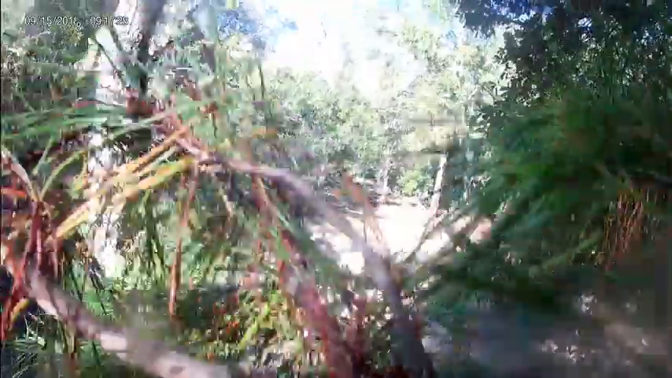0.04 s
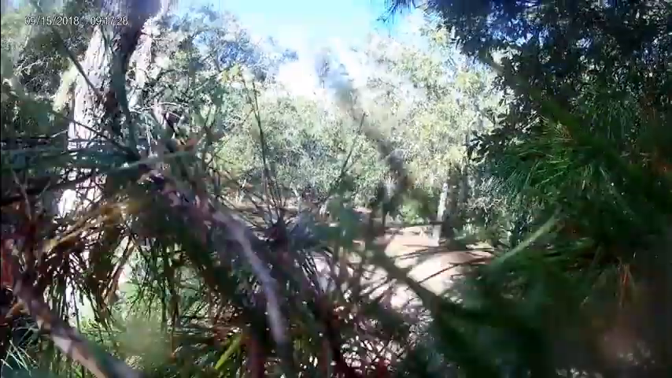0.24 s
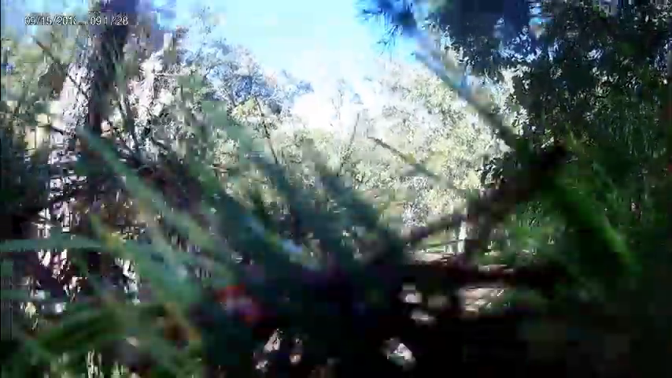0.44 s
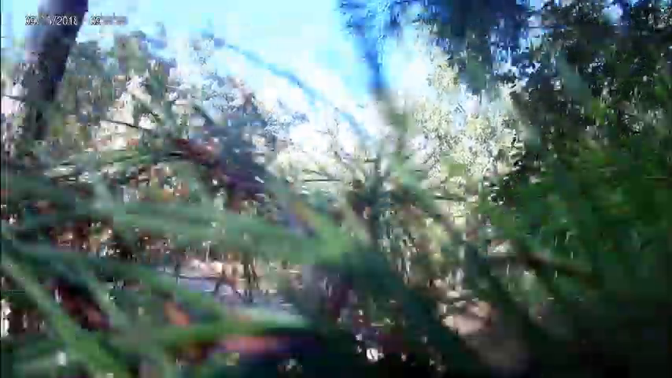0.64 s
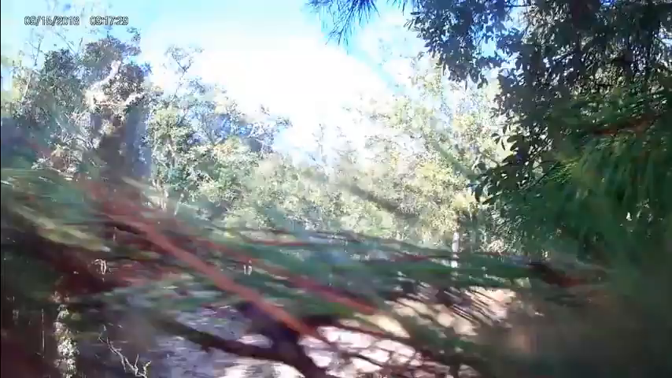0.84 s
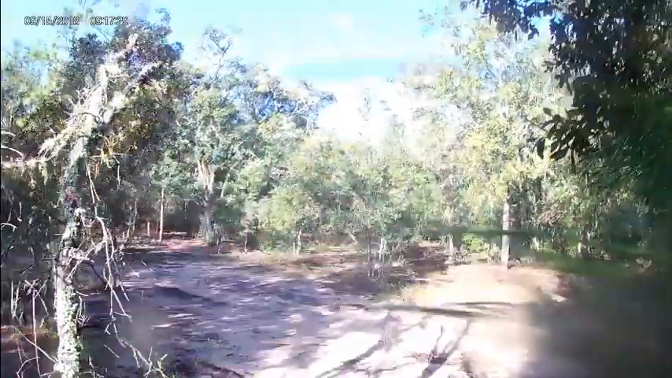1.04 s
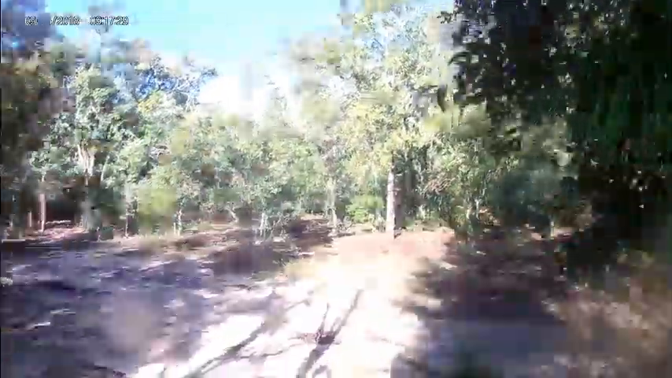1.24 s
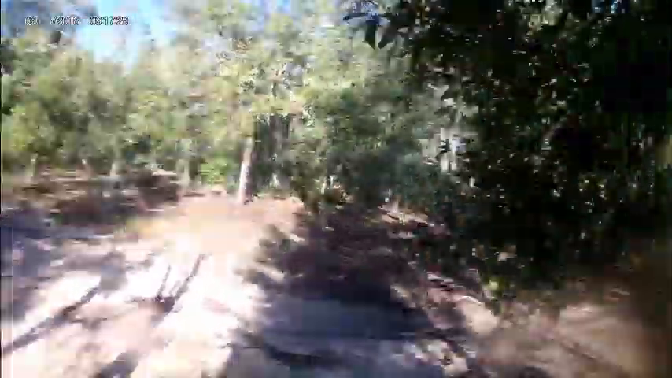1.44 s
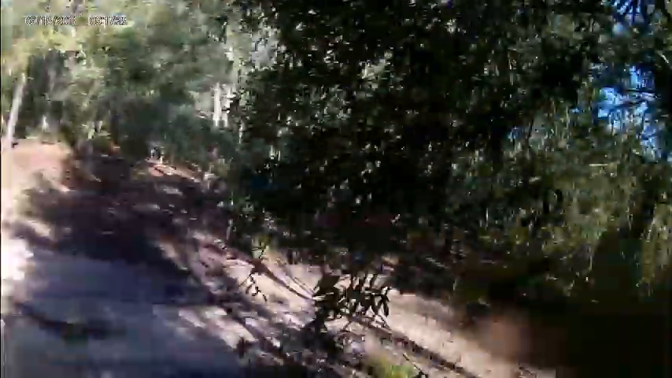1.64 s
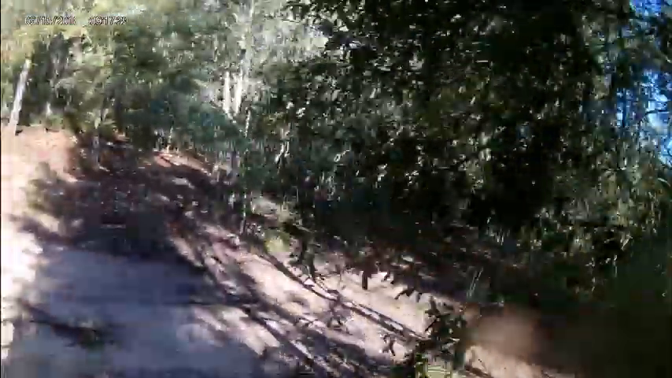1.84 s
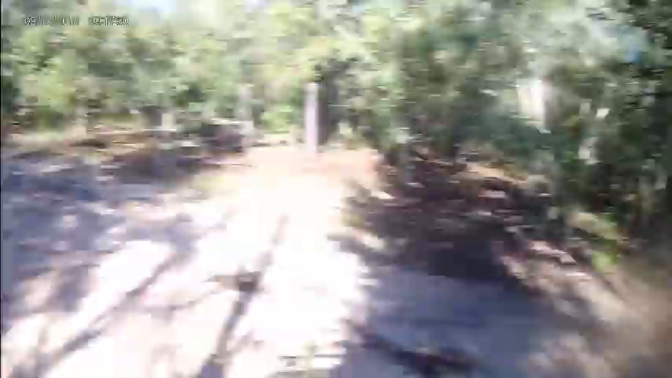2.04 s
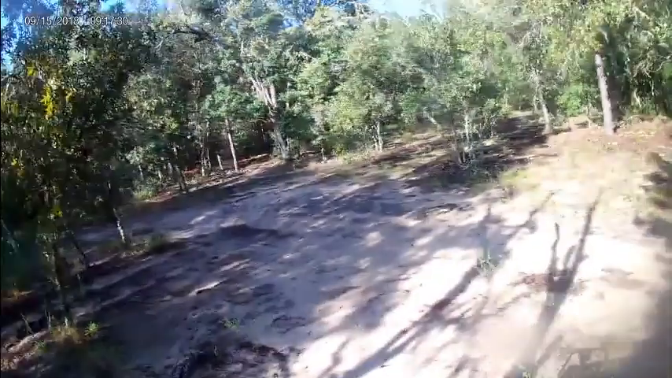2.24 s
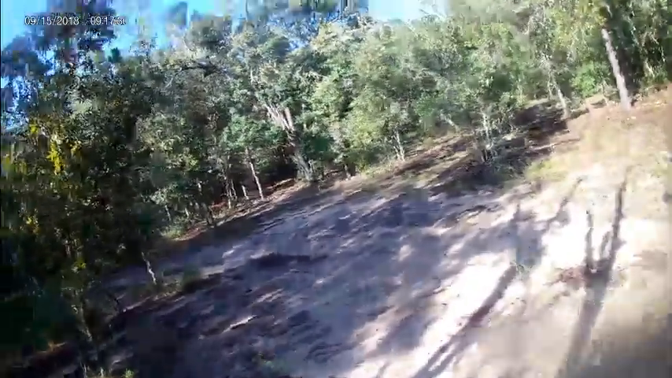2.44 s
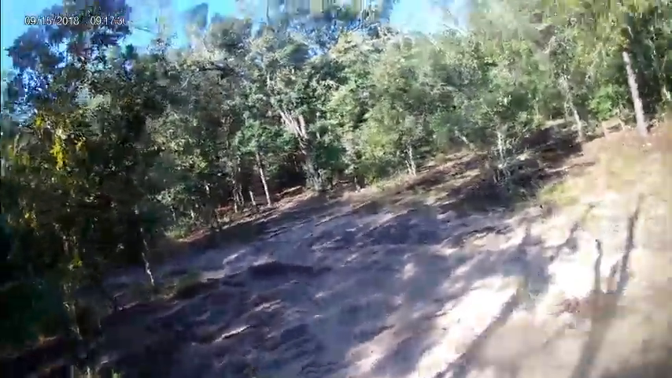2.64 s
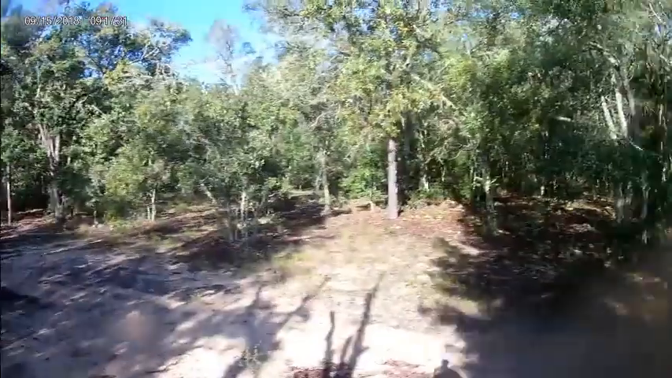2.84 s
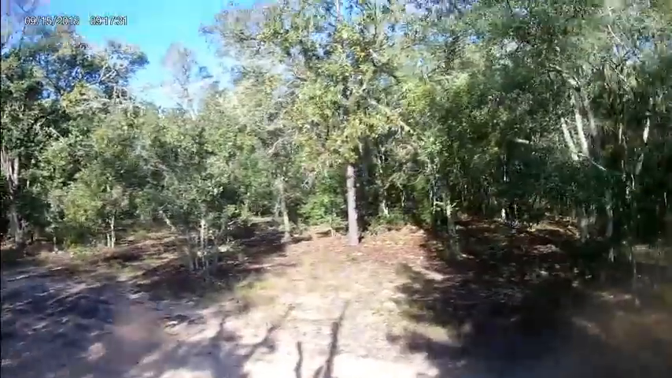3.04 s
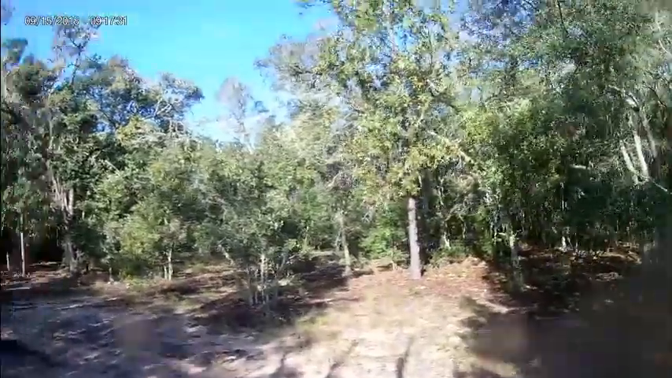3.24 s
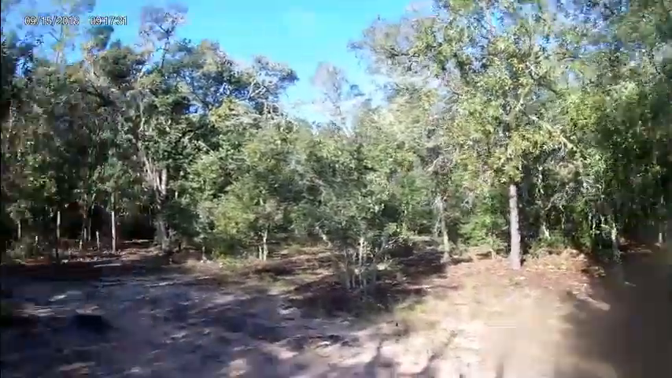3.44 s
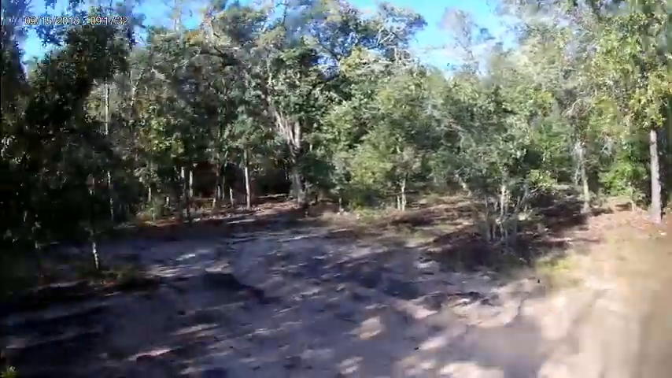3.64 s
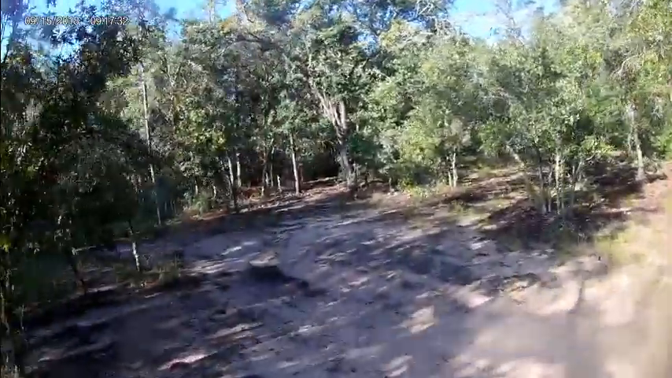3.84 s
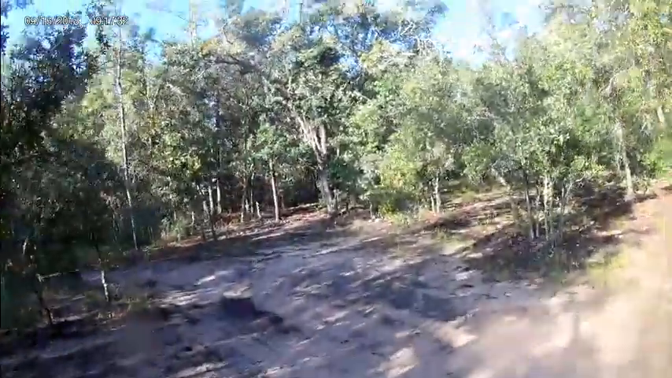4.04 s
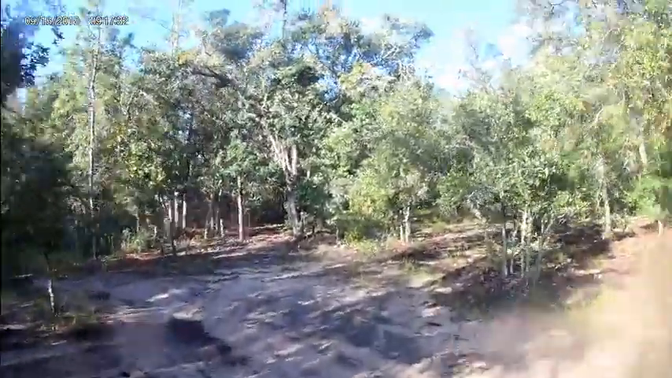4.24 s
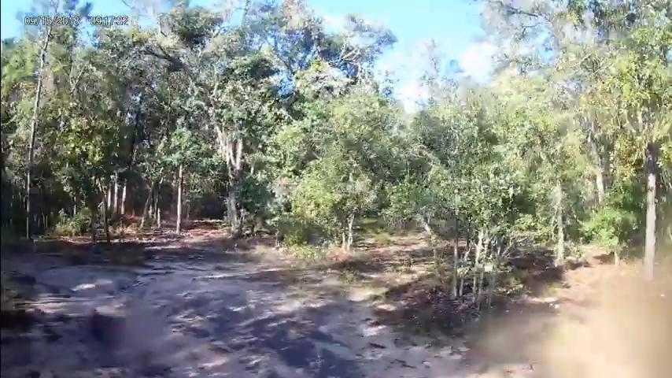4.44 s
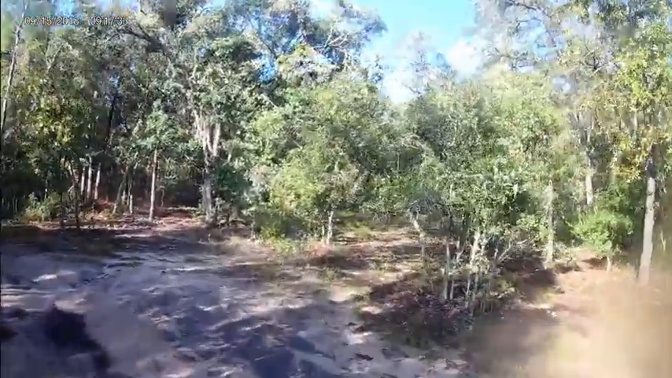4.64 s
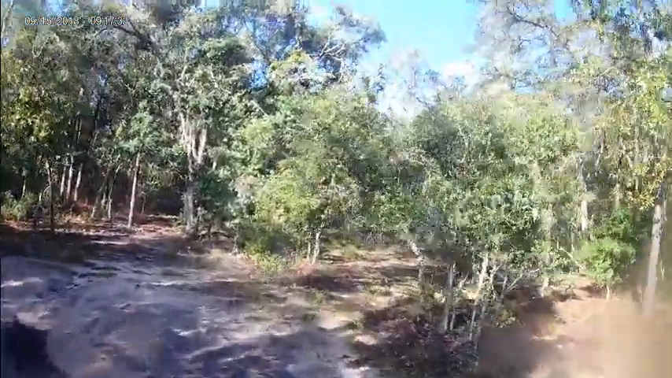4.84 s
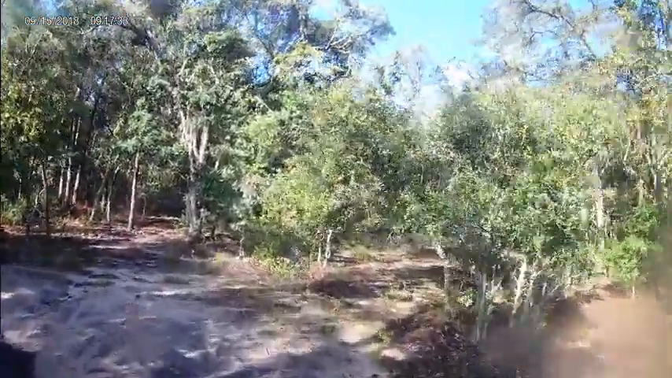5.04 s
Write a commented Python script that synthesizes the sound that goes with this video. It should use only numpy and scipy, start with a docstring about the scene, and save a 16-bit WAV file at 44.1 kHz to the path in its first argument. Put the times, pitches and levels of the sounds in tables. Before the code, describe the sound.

From the start, pine branches drag right across a microphone riding on a slow quad bike, in a quick run of rasping, scratchy strokes. They are loudest from about 0.6 to 1.1 seconds, where boughs thump dully, needles squeak, twigs flick with sharp clicks and the scrape brightens to a hiss. A last, softer brush fades by 1.4 seconds.

The rest is much quieter: the close, low putter of a single-cylinder engine over tyres rumbling softly on sand, with a barely audible whine around 1.2 to 1.6 seconds. The engine slows slightly near 2 seconds, and a loose plastic panel gives a quick cluster of clacks from 2.1 to 2.3 seconds. Then the putter gradually gets faster and somewhat louder. From about 4.5 seconds it picks up a little more, and a thin drive whine comes up, rising slightly until the end at about 5 seconds.

```python
"""Among pines on soft sand, heard from a camera riding on a creeping quad bike, microphone inside the housing.
Right at the microphone, branches drag past: needles scratch and squeak, boughs thump and twigs flick.
A scrape brightens as the contact slides from wood to needle tips. Close by, the single-cylinder engine
putters on, louder as it fires faster. In the clear the drive whines faintly, loose bodywork clacks over
a bump, and the whine comes up as the rider feeds in a little throttle."""
import sys
import numpy as np
from scipy import signal
from scipy.fft import rfft, irfft
from scipy.io import wavfile
from scipy.ndimage import uniform_filter1d

SR = 44100
rng = np.random.default_rng(int(sys.argv[2]) if len(sys.argv) > 2 else 0)


def to_wav(s):
    """Save 16-bit WAV."""
    ch = np.atleast_2d(s).T  # columns
    pcm = np.round(np.clip(ch, -1, 1) * 32767)  # PCM
    wavfile.write(sys.argv[1], SR, pcm.astype(np.int16))


N = 224954
TAPS = 8192
TIME = np.arange(N) / SR
FREQ = np.maximum(np.arange(TAPS // 2 + 1) * SR / TAPS, 1)

# the engine's firing rate: time_s, rate_hz
FIRING_RATE = [(0.0, 15.68), (1.2, 16.98), (1.45, 17.14), (1.75, 16.84), (2.05, 14.74), (2.3, 15.35),
               (2.55, 17.05), (2.8, 17.85), (3.0, 19.18), (3.4, 19.97), (3.8, 20.45), (4.25, 20.67),
               (4.5, 22.79), (4.8, 24.55), (5.1, 25.23)]
# exhaust boom: frequency_hz, level_db
EXHAUST_SPECTRUM = [(25, -24), (45, -8), (75, -30), (120, -3), (165, -6), (240, -33), (330, 12), (480, -28),
                    (900, -74)]
# exhaust pipe resonance: centre_hz, width_hz, gain_db
PIPE_RESONANCE = [(122, 26, 14)]
# engine casing: frequency_hz, level_db
CASING_SPECTRUM = [(100, -10), (300, -0.5), (550, 2), (700, 1), (860, -6), (1000, -0.5), (1300, 0),
                   (1440, -7.5), (1700, -7), (2100, -15.5), (2700, -22), (4000, -20), (6000, -26),
                   (12000, -42.5)]
# its resonances: centre_hz, width_hz, gain_db
CASING_RESONANCES = [(449.7, 23.8, 6), (768.5, 27, 12), (1050, 35, -9), (1156, 11, 10.5), (1208, 49, 7.5),
                     (1566, 40, 8.5), (1644, 42.5, 3), (1850, 45, 11.5), (2325, 100, 12), (3293, 67, 10.5)]
# casing tones that rise under load: centre_hz, width_hz, level_db
CASING_TONES = [(767.4, 28, 0), (1016, 49, -5)]
# tyres rolling on sand: frequency_hz, level_db
TYRE_SPECTRUM = [(20, -3), (45, -2), (120, 2), (180, -5), (250, -4.5), (500, -15.5), (1200, -18),
                 (2600, -29), (6000, -44)]
# branches dragging over the housing: contact_s, slip_off_s, force_db, force_gained_db,
# first_place, last_place (0 = bare wood, 1 = needle tips), shake_db
BRANCH_DRAGS = [(0.013, .08, -13, -2, 0.16, .2, -15.5), (0.105, 0.253, -10, -4.5, 0.31, 0.067, -6.5),
                (0.292, 0.34, -9.5, 2, 0.21, 0.34, -6), (0.369, 0.421, -9.5, 3, 0.41, 0.3, -5),
                (0.434, 0.607, -20, 8, 0.26, .1, -3.5), (0.617, 0.624, -1.5, 0, .05, .05, -3.5),
                (0.648, 0.847, -1.5, -0.5, 0.17, 0.55, 1), (0.876, 1.087, 2, -1.5, 0.65, 0.91, -5),
                (1.125, 1.139, -13.5, -1, 0.18, 0.061, -0.5),
                (1.177, 1.405, -34.5, -8.5, 0.095, 0.45, 10.5)]
# camera housing: frequency_hz, level_db
HOUSING_SPECTRUM = [(20, 5), (60, 11.5), (105, 15), (200, 8.5), (400, -0.5), (600, -6), (950, -4),
                    (1500, 0), (2000, -4), (2750, -11.5), (3700, -4), (5400, -12), (8600, -23),
                    (11800, -20)]
# its resonances: centre_hz, width_hz, gain_db
HOUSING_RESONANCES = [(147.3, 13.3, 2.2), (448, 50, 10.65), (500, 46, 1.3), (746, 21, 9), (1230, 45, 5.3),
                      (1530, 70, 3.53), (2247, 81, 16.8), (2400, 140, 9.4), (3332, 218.6, 5.5),
                      (4062, 370, 2.5), (4670, 89, 2.8), (6650, 590, 5.7), (9500, 300, 4.3)]
# squeak of pressed needles: centre_hz, width_hz, level_db
NEEDLE_TONES = [(3600, 70, 10), (3760, 42, -17), (3924, 220, -0.5), (4060, 220, 2), (4350, 76, 2)]
# boughs thumping the mount: start_s, peak_db, pitch_hz
BOUGH_THUMPS = [(.158, -29, 340), (0.651, -22, 340), (.696, -22, 420), (.766, -22, 300), (.904, -21.5, 432),
                (.921, -25, 387)]
# twigs flicking the housing: start_s, peak_db, tilt_db_per_octave
TWIG_FLICKS = [(.233, -47, 12), (.797, -30, 10), (.831, -19, 0.5), (0.902, -15.5, -3.5), (0.932, -21, -12),
               (0.996, -19.5, -9), (1.034, -16.5, 7), (1.068, -16, 9.5), (1.095, -17, 5)]
# spells of drive whine: start_s, end_s, start_pitch_hz, end_pitch_hz, level_db
WHINE_SPELLS = [(1.15, 1.596, 1218, 1180, -72), (4.52, 4.85, 1148, 1146, -70),
                (4.875, 5.07, 1169, 1205, -55.5)]
# loose bodywork clacking: start_s, peak_db, tilt_db_per_octave, rebound_relative_db
PANEL_CLACKS = [(2.099, -49, -11, -13), (2.117, -47, -2, -9), (2.1449, -34.5, -3.5, -20),
                (2.168, -32, 7.5, -6.5), (2.2, -42.5, 8.5, -8), (2.2245, -36.5, -1, -7)]
# body panel: frequency_hz, level_db
PANEL_SPECTRUM = [(80, -6), (300, 0), (500, 5), (900, -8.5), (1600, -6.5), (2200, -13.5), (3000, -34.5),
                  (4500, -49), (10000, -62)]
# its resonances: centre_hz, width_hz, gain_db
PANEL_RESONANCES = [(432, 24, 12.4), (532, 39, 6.5), (702, 27, 10.6), (1020, 70, 11.4), (1260, 75, 9.9),
                    (1440, 60, 3.6), (1503, 54, 13), (1770, 90, 5.3), (2620, 140, 8.6), (3420, 140, 14)]


def undb(db):
    """Decibels to gain."""
    return np.exp(np.asarray(db) * (np.log(10) / 20))


def shape(points, modes=()):
    """Gain per frequency: a smooth slope with resonances standing on it."""
    hz, db = np.transpose(points)
    slope = undb(np.interp(np.log(FREQ), np.log(hz), db))
    peaks = sum((undb(2 * gain_db) - 1) / (1 + (2 * (FREQ - centre) / width) ** 2)
                for centre, width, gain_db in modes)
    return slope * np.sqrt(np.maximum(1 + peaks, .01))


def tones(modes):
    """Gain of a few lone resonances with nothing between them."""
    return sum(undb(db) * np.exp(-((FREQ - hz) / width) ** 2) for hz, width, db in modes)


def band(lo_hz, hi_hz, order):
    """Gain of a band-pass."""
    return ((1 + (lo_hz / FREQ) ** (2 * order)) * (1 + (FREQ / hi_hz) ** (2 * order))) ** -.5


def ring(x, gain):
    """Pass x through a causal, unit-energy response shaped like this gain."""
    cepstrum = irfft(np.log(gain / gain.max() + 1e-5))
    cepstrum[1:TAPS // 2] *= 2
    cepstrum[TAPS // 2 + 1:] = 0
    response = irfft(np.exp(rfft(cepstrum)))
    return signal.fftconvolve(x, response / np.linalg.norm(response))[:len(x)]


def wander(rate_hz):
    """Glides between random levels, with a spread of 1."""
    hold = max(int(SR / rate_hz), 1)
    levels = rng.standard_normal(N)
    slewed = uniform_filter1d(levels[np.arange(N) // hold], hold)
    return slewed / slewed.std()


def slips(per_s, spread_db, rub):
    """Stick-slip clicks at random moments over a smooth rubbing noise; rms 1."""
    clicks = (rng.random(N) < per_s / SR) * rng.choice([-1, 1], N)
    clicks = clicks * undb(spread_db * np.clip(rng.standard_normal(N), -2, 2))
    friction = clicks / clicks.std() + rub * rng.standard_normal(N)
    return friction / friction.std()


def blow(crunch, decay_s):
    """One sharp contact with a short crunch after it."""
    hit = crunch * rng.standard_normal(TAPS) * np.exp(-TIME[:TAPS] / decay_s)
    hit[0] += 1
    return hit


def add(out, start_s, peak_db, hit):
    """Place a hit at its time and peak level."""
    i = int(start_s * SR)
    out[i:i + len(hit)] += (hit * undb(peak_db) / np.abs(hit).max())[:N - i]


def envelope(start_s, end_s, attack_s, release_s):
    """Swells to full by the start, holds, and dies away after the end."""
    return np.exp(-np.maximum(start_s - TIME, 0) / attack_s - np.maximum(TIME - end_s, 0) / release_s)


def progress(start_s, end_s):
    """Runs evenly from 0 to 1 between two times."""
    return np.clip((TIME - start_s) / (end_s - start_s), 0, 1)


def exhaust(firing_hz, cycles, speed_octaves, load):
    """Each firing booms down the pipe and putts in the silencer: louder with speed, softer under load."""
    putt_hz, putt_s = 260, .006
    firings = np.diff(np.floor(cycles), prepend=0) * np.sqrt(SR / firing_hz)
    boom = ring(-firings * undb(0.73 * wander(40)), shape(EXHAUST_SPECTRUM, PIPE_RESONANCE))
    # gas swings to and fro in the silencer, so each putt swells and fades roundly
    from_crest_s = ((cycles - .1 + .5) % 1 - .5) / firing_hz
    swell = np.exp(-(from_crest_s / putt_s) ** 2)
    swing = -np.cos(2 * np.pi * putt_hz * from_crest_s + .2 * wander(38))
    putt = swing * swell * undb(0.43 * wander(18))
    puffs = undb(-7.5) * boom + undb(-2) * putt / putt.std()
    return puffs * undb(-60.5 + 13 * speed_octaves - 13 * load)


def piston_and_valves(firing_hz, cycles, speed_octaves):
    """The piston clatters in the casing; the valves chuff before each firing and stand out at idle."""
    opens_at_cycle, rise_s, decay_s = .76, .003, .022
    casing = shape(CASING_SPECTRUM, CASING_RESONANCES)
    throb = undb(2 * np.cos(2 * np.pi * (cycles - .14)))  # loudest just after the firing
    clatter = ring(slips(per_s=2500, spread_db=1.5, rub=0.98) * throb, casing)
    open_s = (cycles - opens_at_cycle) % 1 / firing_hz
    chuff = np.minimum(open_s / rise_s, 1) * np.exp(-open_s / decay_s)
    valves = ring(chuff * rng.standard_normal(N), casing * band(1350, 2250, order=3))
    return (clatter + undb(-3.5 * speed_octaves) * valves) * undb(-63.5 + 9 * speed_octaves)


def casing_ring(load):
    """The engine casing rings faintly, and more strongly under load."""
    return undb(-75.5 + 13.5 * load) * ring(rng.standard_normal(N), tones(CASING_TONES))


def tyres():
    """Below the camera, tyres rumble unevenly over soft sand, with a faint steady hiss."""
    rumble = undb(-61 + 1.2 * wander(11)) * ring(rng.standard_normal(N), shape(TYRE_SPECTRUM))
    hiss = undb(-82.5) * ring(rng.standard_normal(N), band(1000, 6220, order=1))
    return rumble + hiss


def housing():
    """Gain from a touch on the housing to the microphone inside; a narrow treble band is missing."""
    notch_hz, width_hz = 8030, 560
    notch = 1 - np.exp(-(2 * (FREQ - notch_hz) / width_hz) ** 4)
    return shape(HOUSING_SPECTRUM, HOUSING_RESONANCES) * notch


def branch_contacts():
    """Branches bend on, slide and slip off: strength of buffeting, bark rasp, needle scratch, tip hiss."""
    touch_s, needle_lag_s, slip_off_s, settle_s = 0.01838, 0.0088, 0.015, 0.012
    tuft_place, tuft_half_width = 0.67, 0.3  # where the needles stand thickest
    power = np.zeros((4, N))
    for start, end, force_db, gained_db, first_place, last_place, shake_db in BRANCH_DRAGS:
        slid = progress(start, end)
        place = first_place + (last_place - first_place) * slid
        push_db = force_db + gained_db * slid
        shake = envelope(start, end, touch_s, settle_s)
        wood = envelope(start, end, touch_s, slip_off_s)
        foliage = envelope(start + needle_lag_s, end, touch_s, slip_off_s)
        tuft = np.exp(-((place - tuft_place) / tuft_half_width) ** 2)
        power += np.square([shake * undb(push_db - 32.5 + shake_db),
                            wood * undb(push_db - 36.5),
                            foliage * undb(push_db - 39 + 11 * tuft),
                            foliage * undb(push_db - 59 + 20 * place)])
    return np.sqrt(power)


def branches(shell):
    """Bark and needles catch and slip on the housing, in bunches; the boughs shake it as they pass."""
    shaking, rasping, scratching, hissing = branch_contacts()
    bunches = undb(1.67 * wander(220) + wander(45) - 0.5)
    scratch = bunches * slips(per_s=1700, spread_db=0, rub=0.56)
    buffet = ring(slips(per_s=700, spread_db=0.5, rub=1) * shaking, shell * band(22, 596, order=6))
    bark = ring(scratch * rasping, shell * band(550, 2040, order=6))
    # pressed hard, the needles give up some of their scratch for a squeak
    pressure = np.clip((scratching - undb(-42)) / undb(-25), 0, 1)
    prickle = 0.98 * scratch + 0.42 * slips(per_s=1800, spread_db=5.5, rub=0.345)
    needles = ring(prickle * scratching * undb(-4 - 3.18 * pressure), shell * band(2470, 5470, order=8))
    catches = bunches * slips(per_s=430, spread_db=6.5, rub=.2)
    squeak = ring(catches * pressure * scratching * undb(-3.5), tones(NEEDLE_TONES))
    # the tips snap free one by one
    snaps = undb(-11.5) * slips(per_s=35, spread_db=1, rub=.1)
    tips = ring((scratch + snaps) * hissing, shell * band(5730, 13200, order=10))
    return buffet + bark + needles + squeak + tips


def boughs(shell):
    """Heavy boughs push the whole camera mount with a dull thump."""
    out = np.zeros(N)
    for start, peak_db, hz in BOUGH_THUMPS:
        mount = shell * band(0.77 * hz, 1.3 * hz, order=2)
        add(out, start, peak_db, ring(blow(crunch=0.072, decay_s=.005), mount))
    return out


def twigs(shell):
    """Twigs whip the housing with a click, right at the microphone."""
    out = np.zeros(N)
    for start, peak_db, tilt in TWIG_FLICKS:
        colour = shell * band(750, 11920, order=2) * undb(tilt * np.log2(FREQ))
        add(out, start, peak_db, ring(blow(crunch=0.44, decay_s=0.00117), colour))
    return out


def drive_whine(cycles):
    """The drive sings in spells, wavering in pitch and fluttering with each firing."""
    flutter = 1 + 0.25 * np.cos(2 * np.pi * cycles)
    waver = 1 + .005 * wander(70)
    out = np.zeros(N)
    for start, end, from_hz, to_hz, level_db in WHINE_SPELLS:
        hz = (from_hz + (to_hz - from_hz) * progress(start, end)) * waver
        tone = np.sqrt(2) * np.sin(2 * np.pi * np.cumsum(hz) / SR)
        out += undb(level_db) * envelope(start, end, attack_s=0.062, release_s=0.034) * flutter * tone
    return out


def bodywork():
    """A loose plastic panel close by hits the frame and rebounds twice, weaker and duller."""
    rebound_s, dulling_db_per_octave = 0.0041, 4.5
    panel = shape(PANEL_SPECTRUM, PANEL_RESONANCES) * band(127, 3600, order=4)

    def knock(tilt):
        """One contact of the panel, at this brightness."""
        return ring(blow(crunch=0.098, decay_s=0.0043), panel * undb(tilt * np.log2(FREQ)))

    out = np.zeros(N)
    for start, peak_db, tilt, rebound_db in PANEL_CLACKS:
        add(out, start, peak_db, knock(tilt))
        for bounce in (1, 2):
            add(out, start + bounce * rebound_s, peak_db + rebound_db, knock(tilt - dulling_db_per_octave))
    return out


def scene():
    """Everything in mono, from the camera on the moving bike."""
    firing_hz = np.interp(TIME, *np.transpose(FIRING_RATE))
    cycles = np.cumsum(firing_hz) / SR
    speed_octaves = np.log2(firing_hz / 20)
    load = progress(start_s=4.33, end_s=5.0)  # the drive takes up load
    engine = exhaust(firing_hz, cycles, speed_octaves, load)
    engine += piston_and_valves(firing_hz, cycles, speed_octaves) + casing_ring(load)
    shell = housing()
    pines = branches(shell) + boughs(shell) + twigs(shell)
    return (engine + tyres() + pines + drive_whine(cycles) + bodywork())[None]


def record(dry):
    """The camera cuts the top treble off steeply."""
    top_hz = 12150
    return signal.sosfilt(signal.ellip(12, .2, 70, top_hz, fs=SR, output="sos"), dry)


dry = scene()
out = record(dry)
to_wav(out)
```